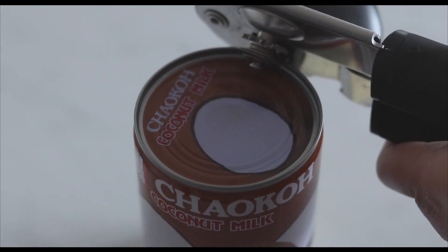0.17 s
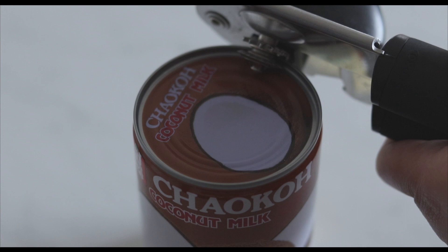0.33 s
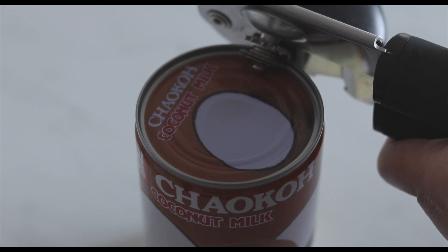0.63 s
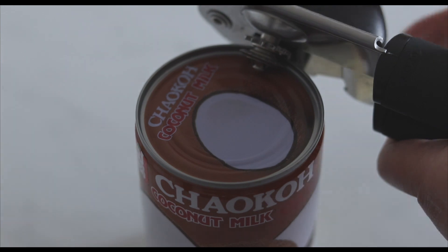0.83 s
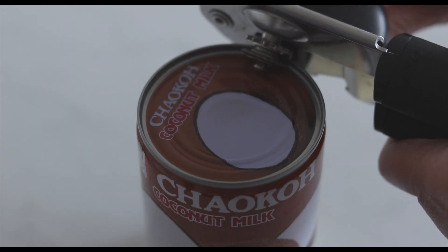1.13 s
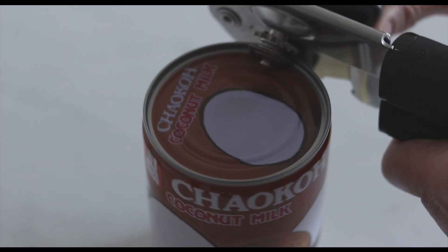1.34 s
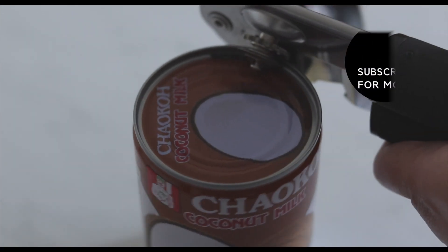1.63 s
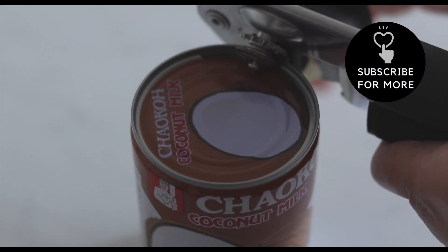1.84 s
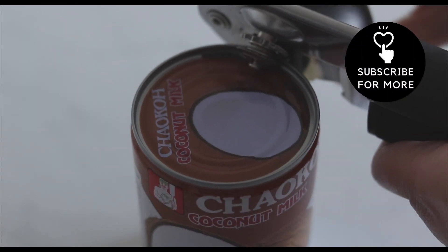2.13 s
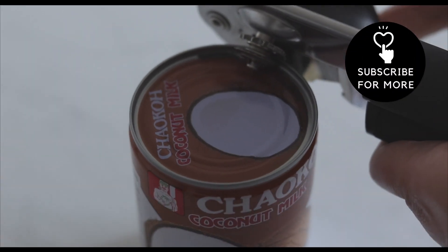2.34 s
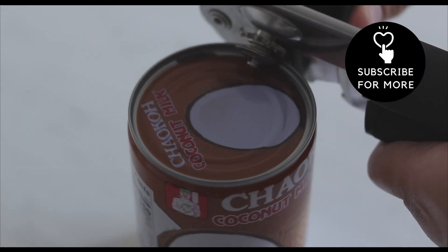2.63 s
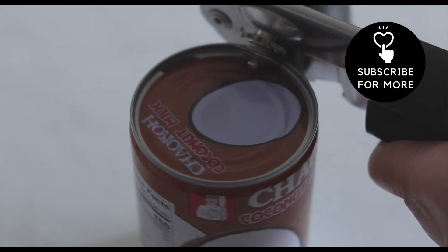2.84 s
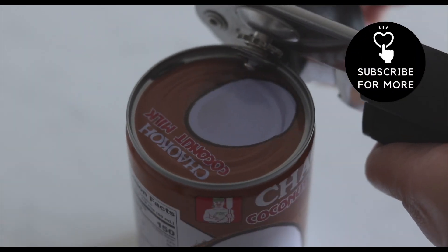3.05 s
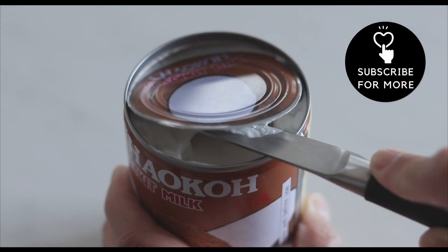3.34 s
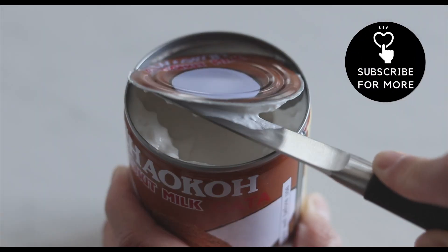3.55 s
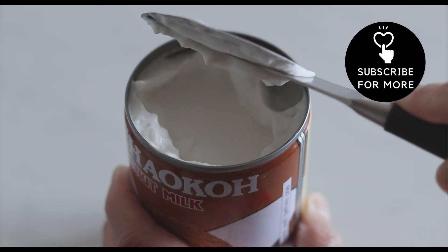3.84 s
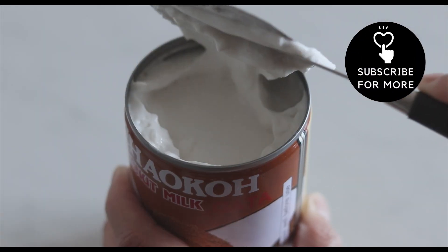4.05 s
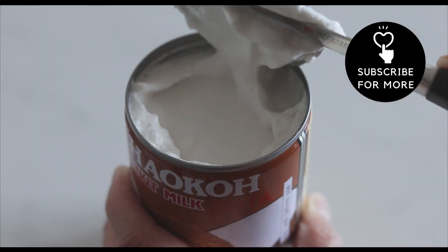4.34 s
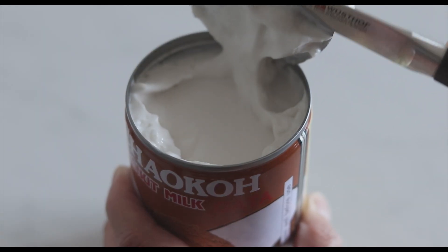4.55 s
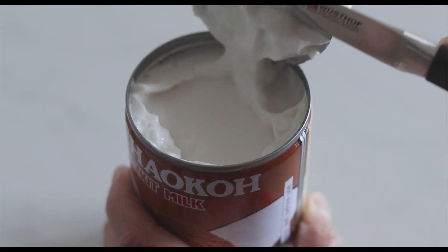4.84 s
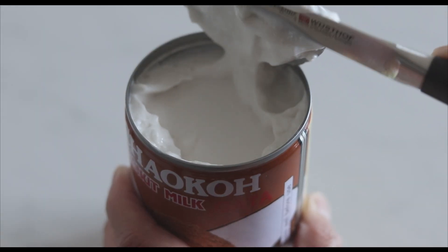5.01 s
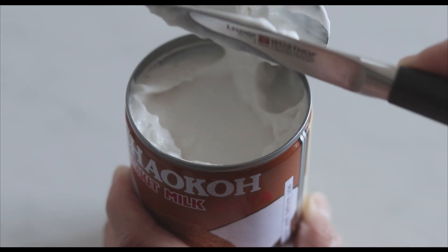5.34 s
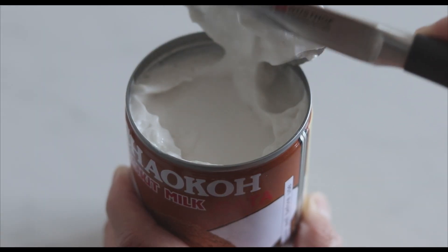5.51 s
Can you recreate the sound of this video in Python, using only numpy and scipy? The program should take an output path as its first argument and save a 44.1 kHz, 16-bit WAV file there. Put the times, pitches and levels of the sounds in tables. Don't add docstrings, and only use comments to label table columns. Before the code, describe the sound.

A full metal can is opened on a counter, heard close. Quiet handling leads to a piercing, clipped crack with a rattling room tail. The opener then clunks and crunches in two bursts, separated by light gear rubbing and one squeak. A blade stutters under the lid, plucking bent metal, and ends with very soft wet dabs over quiet room hum and hiss.

```python
import sys
import numpy as np
from scipy import signal
from scipy.fft import rfft, irfft
from scipy.io import wavfile

SR = 44100
rng = np.random.default_rng(int(sys.argv[2]) if len(sys.argv) > 2 else 0)


def volts(x):
    e = np.asarray(x, float) / 20
    return 10 ** e


def dump_mix(stems):
    frames = np.atleast_2d(stems).T
    limited = np.clip(frames, -1, 1)
    pcm = np.round(limited * 32767).astype(np.int16)
    wavfile.write(sys.argv[1], SR, pcm)


N = 250047


def evened(x):
    return x / np.sqrt(np.mean(x ** 2) + 1e-30)


def peaked(x):
    return x / abs(x).max()


def read(points, hz):
    f, value = np.transpose(points)
    return np.interp(np.log(hz + 1), np.log(f + 1), value)


def add(mix, s, sound):
    part = mix[round(s * SR):][:len(sound)]
    part += sound[:len(part)]


def coloured(x, points):
    cepstrum = irfft(np.log(volts(read(points, np.fft.rfftfreq(4096, 1 / SR)))))
    cepstrum[1:2048] *= 2
    cepstrum[2049:] = 0
    impulse = irfft(np.exp(rfft(cepstrum)))
    return evened(signal.oaconvolve(x, impulse)[:len(x)])


def resonate(x, hz, width):
    turn = np.exp(2j * np.pi * np.cumsum(hz * np.ones(len(x))) / SR)
    r = np.exp(-np.pi * width / SR)
    return 2 * (turn * signal.lfilter([1 - r], [1, -r], x / turn)).real


def resonate_twice(x, hz, width):
    return resonate(resonate(x, hz, width), hz, width)


def body(x, peaks):
    out = np.zeros(len(x))
    for k, (hz, width, db) in enumerate(peaks):
        out += (-1) ** k * volts(db) / np.sqrt(width) * resonate(x, hz, width)
    return evened(out)


def ring(hz, t60, rise=0.0013):
    t = np.arange(4000) / SR
    return volts(-60 * t / t60) * (1 - np.exp(-t / rise)) * np.sin(2 * np.pi * hz * t)


def plucks(rows, trim_db, t60, rise):
    out = np.zeros(N)
    for s, db, hz in rows:
        pair = ring(hz, t60, rise=rise) + .4 * ring(hz * 1.12, t60 * .7, rise=rise)
        add(out, s, volts(db + trim_db) * peaked(pair))
    return out


def grit(per_s, spread_db, lump_s=0.0029, count=N):
    draw = rng.random((count, 2))
    sizes = volts(-spread_db * np.log(draw[:, 0] + 1 / 20)) * (draw[:, 1] < per_s / SR)
    lumps = signal.lfilter([1], [1, -np.exp(-1 / (lump_s * SR))], sizes)
    return rng.standard_normal(count) * (.5 + lumps)


def burst(length, t60):
    t = np.arange(1500) / SR
    return rng.standard_normal(len(t)) * np.minimum(t / 0.00028, 1) * volts(-60 * np.maximum(t - length, 0) / t60)


def swell(start, end):
    count = round((end - start) * SR)
    return signal.windows.tukey(count, .3) * np.linspace(.6, 1, count)


def strokes(rows, slack_db):
    edge_s = .008
    out = np.zeros((2, N))
    for start, end, db, lean, hiss_db in rows:
        t = np.arange(0, end - start, 1 / SR)
        top = np.clip(lean, .02, .98) * (end - start)
        away = np.where(t < top, 1 - t / top, (t - top) / (end - start - top))
        fade = np.clip(np.minimum(t, t[::-1]) / edge_s, 0, 1)
        gain = volts(db + slack_db * away ** 2) * fade
        add(out[0], start, gain)
        add(out[1], start, volts(hiss_db) * gain)
    return out


# pitch_hz, width_hz, level_db
DRONES = [
    (115.9, 17, -7.5),
    (222, 26, -2),
]
# pitch_hz, width_hz, level_db
MOTOR_WHINE = (1345, 81, -19)
# start_s, end_s, pitch_hz, width_hz, level_db
PASSING_DRONE = (1.1, 2.5, 167, 9, -68)
# time_s, level_db
DRONE_LEVEL = [(0, -69.5), (1.3, -63.5), (2.4, -68.5), (3.2, -70.5), (3.9, -73), (5.67, -71.5)]
# freq_hz, level_db (per Hz)
AIR_COLOUR = [(20, -12), (60, -6), (150, -8.5), (300, -9.5), (800, -14), (1600, -20.5), (3000, -25),
              (6000, -28), (11500, -29), (12800, -32), (13500, -35), (16000, -35)]


def air():
    noise = rng.standard_normal((5, N))
    drones = sum(volts(db) * evened(resonate(z, hz, width)) for z, (hz, width, db) in zip(noise, DRONES))
    hz, width, db = MOTOR_WHINE
    drones += volts(db) * evened(resonate_twice(noise[4], hz, width))
    level_db = np.interp(np.arange(N) / SR, *np.transpose(DRONE_LEVEL))
    out = volts(-73) * coloured(noise[2], AIR_COLOUR) + volts(level_db) * drones
    start, end, hz, width, db = PASSING_DRONE
    shape = swell(start, end)
    add(out, start, volts(db) * shape * evened(resonate(noise[3], hz, width))[:len(shape)])
    return out


# start_s, end_s, crunch_db, build_share (of the push), tear_db
TURNS = [(0.0, .36, -69, 0.093, -8.5), (.95, 1.17, -69.5, .15, -9), (1.17, 1.41, -66.5, 1, -12.5),
         (1.39, 1.6, -54.5, .2, -12), (1.56, 1.86, -56, 0.44, -11.5), (1.86, 2.06, -71, 0.099, -6),
         (2.06, 2.42, -72, .4, -12), (2.41, 2.57, -60.5, 0.89, -10), (2.56, 2.81, -56, 0.19, -13.5),
         (2.81, 3.09, -54, 0.35, -11), (3.1, 3.22, -64, .1, -4.5), (3.26, 3.42, -66, 0.27, -11.5)]
# freq_hz, level_db (per Hz)
CRUNCH_COLOUR = [(88, -37), (150, -9), (373, -3), (572, 1.5), (688, -5), (816, 1), (1070, -9), (1400, -11),
                 (1570, -12), (1970, -11), (2240, -19), (3390, -21.5), (4500, -28), (5850, -55.5),
                 (9900, -120)]
# freq_hz, level_db (per Hz)
TEAR_COLOUR = [(1470, -28.5), (2500, -1), (5970, -3), (6590, -3.5), (8220, -2.5), (8870, -3), (11000, -13),
               (15500, -20)]
# time_s, pitch_hz, level_db
WHEEL_RING = [
    (1.3, 1501, -17),
    (1.9, 1500, -21),
    (2.4, 1900, -7.5),
    (3.05, 1820, -8),
    (3.25, 1450, -10),
]
# start_s, peak_db, pitch_hz
DABS = [(1.417, -29.5, 398), (1.444, -35, 517), (1.454, -38, 825), (1.499, -42, 598), (1.547, -45, 377),
        (1.654, -47, 589), (1.684, -48, 503), (1.744, -43, 618.6), (1.774, -42.5, 896), (1.792, -48, 388),
        (2.529, -49.5, 388), (2.589, -44, 848), (2.611, -45, 834), (2.646, -46, 729), (2.671, -45.5, 606),
        (2.704, -48.5, 384), (2.734, -50.5, 334), (2.768, -50, 836), (2.877, -38.5, 583), (2.967, -44, 763),
        (2.984, -43, 630), (3.029, -57, 611), (3.054, -53, 584), (3.25, -50.5, 740), (3.299, -54, 789),
        (3.346, -53, 592), (4.202, -63, 840), (4.491, -59, 853), (4.559, -63, 907), (4.634, -59, 810),
        (4.67, -57, 867), (4.985, -59, 842)]


def cutting():
    slip = grit(500, 2.5, lump_s=.0015)
    hiss = coloured(grit(900, .5, lump_s=.003), TEAR_COLOUR)
    s, hz, db = np.transpose(WHEEL_RING)
    t = np.arange(N) / SR
    wheel = volts(np.interp(t, s, db)) * evened(resonate_twice(slip, np.interp(t, s, hz), 450))
    push, tear = strokes(TURNS, -9.5)
    crunch = coloured(slip, CRUNCH_COLOUR)
    return push * (crunch + wheel) + tear * hiss + plucks(DABS, -3, .03, .0015)


# start_s, peak_db, pitch_hz (strongest), hardness_db
KNOCKS = [(0.094, -37, 540, -12), (1.111, -37, 410, -9), (1.403, -21.5, 819, -2), (1.434, -30.5, 476, -13),
          (1.477, -36, 407, -5.5), (1.534, -30.5, 495, -15), (1.625, -40.5, 574, -4),
          (1.728, -40.5, 595, -5), (1.762, -41, 792, -13), (2.486, -44, 856, -13.5),
          (2.567, -40, 398.4, -5.5), (2.837, -37, 615.6, -23), (2.866, -37.5, 529.6, -20),
          (2.894, -38.5, 484, -14), (2.923, -33.5, 600, -15), (2.947, -39.5, 820, -22),
          (3.003, -42, 460, -3.5), (3.191, -30.5, 523, -9.5), (4.009, -52.5, 836, -9),
          (4.259, -47.5, 799, -6), (4.292, -57, 853, -16.5), (4.754, -49, 451.6, -5.5),
          (4.961, -56, 827, -14.5), (5.031, -50, 872, -11), (5.049, -55, 856, -9)]
# pitch_hz, level_db
TIN_MODES = [(405, -5.5), (600, -6), (845, -6.5), (1450, -11), (1900, -16), (2150, -18)]
# freq_hz, level_db (per Hz)
THUD_COLOUR = [(88, -37), (150, -7), (615, 1), (1540, -20.5), (2430, -34), (3920, -37), (6430, -43),
               (7310, -39), (12000, -47), (15600, -81), (22000, -120)]
# freq_hz, level_db (per Hz)
CLUNK_COLOUR = [(350, -30), (600, -0.5), (1030, -2), (2100, -14), (3790, -33.5), (6020, -35.5), (6490, -41),
                (12000, -52), (15600, -86), (22000, -120)]
# start_s, peak_db, pitch_hz
JAW_RINGS = [(1.1109, -54, 1350), (1.4027, -23.5, 1450), (1.4332, -40, 1106), (1.4764, -42, 1330),
             (1.6241, -42, 1340), (1.728, -45, 1330), (1.7614, -51.5, 1150), (2.5244, -52.5, 1130),
             (2.5675, -45.5, 1352), (2.595, -50, 1474), (2.6094, -55, 1360), (2.6852, -51.5, 1170),
             (2.7407, -54, 1790), (2.845, -47, 1746), (2.8669, -47, 1730), (2.9235, -48.5, 1840),
             (2.9465, -54, 1320), (3.003, -44, 1200), (3.1243, -48.5, 1250), (3.1887, -48, 1130),
             (4.1754, -56.5, 1410), (4.7524, -61, 1960), (5.0494, -59, 1140)]
# start_s, peak_db, pitch_hz
FRAME_RINGS = [
    (1.4029, -28, 1710),
    (1.411, -42, 1850),
    (1.6657, -51, 1920),
    (1.7035, -47.5, 3370),
    (2.9233, -47, 1830),
    (3.003, -43, 1800),
    (3.0544, -59, 2570),
    (3.1245, -50, 3320),
]


def knocks():
    t60_s = .027
    out = plucks(JAW_RINGS, -4, 0.023, .001) + plucks(FRAME_RINGS, -3, 0.0135, 0.00053)
    detunes = rng.uniform(.93, 1.2, (len(KNOCKS), len(TIN_MODES)))
    for (s, db, hz, hard_db), detune in zip(KNOCKS, detunes):
        tin = ring(hz, t60_s)
        for (f, mode_db), k in zip(TIN_MODES, detune):
            tilt_db = hard_db * np.log2(f / 400) / 2
            tin += volts(mode_db + tilt_db) * ring(f * k, t60_s * (500 / f) ** 0.19)
        add(out, s, volts(db - 2.5) * peaked(tin))
        add(out, s, volts(db - 7.5) * peaked(coloured(burst(.001, 0.055), THUD_COLOUR)))
        add(out, s, volts(db + 2 * hard_db + 5.0) * peaked(coloured(burst(0.0022, 0.017), CLUNK_COLOUR)))
    return out


# start_s, peak_db, pitch_hz, t60_s
BITE = [(.4258, 5.5, 3940, 0.0096), (0.4263, -2.5, 1875, 0.013), (.4268, -11.5, 14000, 0.011),
        (0.4287, 5, 9000, 0.015), (0.429, -4, 3400, 0.025), (.4305, 0.5, 799, 0.05), (.4315, -8, 1074, .04),
        (.432, -9, 610, .05), (0.43, -2, 1330, 0.021), (.4310, -10, 430, 0.054), (0.431, -21, 330, 0.085),
        (.431, -24, 310, .09), (.4275, -13, 6050, 0.009), (0.445, -11.5, 1135, 0.024),
        (.4340, -17.5, 8280, 0.011)]
# freq_hz, level_db (per Hz)
CRACKLE_COLOUR = [(1350, -31.5), (2300, 1.5), (2530, -2.5), (5070, -4.5), (6750, -4), (7370, -6),
                  (11100, -8), (12300, -18.5), (15500, -18)]
# freq_hz, level_db (per Hz)
BITE_SPREAD = [(59, -57.5), (100, -26), (169, -21), (223, -23), (306, -7), (340, -18.5), (467, -2),
               (712, -5), (774, 0.5), (976, -8.5), (1060, -2), (1800, -8), (4010, -11), (8580, -16),
               (15500, -30.5)]
# pitch_hz, level_db, t60_s, width_hz
HANDLES = [
    (1170, -39, 1.0, 110),
    (1310, -44, 0.94, 90),
    (3880, -46, 1.05, 90),
    (4000, -32, .7, 350),
    (629.4, -36, .6, 80),
]


def bite():
    out, spread = np.zeros((2, N))
    start = BITE[0][0]
    for s, db, hz, t60 in BITE:
        pair = ring(hz, t60, rise=0.00039) + .4 * ring(hz * 1.07, t60 * 1.29, rise=0.00076)
        add(out, s, volts(db) * pair)
    add(out, start, volts(2) * peaked(coloured(burst(0.0053, 0.012), CRACKLE_COLOUR)))
    add(out, start, volts(-26.5) * signal.windows.hann(400))
    add(spread, start, volts(15.5) * coloured(signal.unit_impulse(2000), BITE_SPREAD) / 45)
    t = np.arange(SR) / SR
    for hz, db, t60, width in HANDLES:
        add(out, start, volts(db - 60 * t / t60) * evened(resonate(rng.standard_normal(SR), hz, width)))
    return out, spread


# start_s, end_s, ring_db, pitch_hz, hiss_db
RUBS = [(1.036, 1.11, -88, 9080, -73.5), (1.19, 1.215, -80.5, 3800, -82), (1.865, 1.939, -71, 3870, -68),
        (1.89, 1.927, -69, 9170, -74), (2.01, 2.088, -71, 10060, -73.5), (2.025, 2.046, -74, 12900, -93.5),
        (2.084, 2.116, -81.5, 9530, -66), (2.141, 2.156, -69, 3890, -80), (2.142, 2.26, -81, 3890, -85),
        (2.18, 2.252, -78, 9220, -80), (2.178, 2.257, -82, 7240, -88), (2.292, 2.359, -79.5, 3840, -95),
        (3.127, 3.184, -72, 3820, -66), (3.139, 3.173, -72, 8850, -71.5), (3.228, 3.252, -79.5, 10280, -63)]
# freq_hz, level_db (per Hz)
RUB_COLOUR = [(1760, -43), (3000, -9), (3760, -7), (4750, -22), (8410, -10), (9070, -7), (15500, -16)]
# start_s, end_s, level_db
SQUEAK_AT = (2.07, 2.118, -56)
# pitch_hz, width_hz, level_db
SQUEAK_PEAKS = [
    (790, 250, 0.5),
    (1225, 60, 6),
    (1790, 700, -6),
    (2485, 15, 6.5),
    (3304, 500, -9),
    (3890, 34, -12),
    (6760, 39, -26),
    (7600, 77, -4),
]


def gears():
    out = np.zeros(N)
    for start, end, db, hz, hiss_db in RUBS:
        width = 57 * (hz / 4000) ** 1.7
        rub = grit(900, 1.4, count=8000)
        shape = swell(start, end)
        sound = volts(db) * evened(resonate(rub, hz, width)) + volts(hiss_db) * coloured(rub, RUB_COLOUR)
        add(out, start, shape * sound[-len(shape):])
    start, end, db = SQUEAK_AT
    shape = swell(start, end)
    squeak = body(grit(500, 2.1, count=8000), SQUEAK_PEAKS)
    add(out, start, volts(db) * shape * squeak[-len(shape):])
    return out


# start_s, peak_db, pitch_hz (strongest)
TICKS = [(1.0913, -60, 3906), (1.4015, -36, 3040), (1.411, -48, 3515), (1.4203, -39.5, 2980),
         (1.625, -42.5, 4800), (1.6674, -55, 3334), (1.7039, -47, 3383), (1.7284, -45, 3870),
         (1.7887, -48, 3173), (2.1445, -62, 3890), (2.4863, -59, 3330), (2.5676, -36, 6850),
         (2.5684, -40, 12600), (2.6844, -49.5, 9090), (2.7385, -54.5, 4114), (2.8344, -55, 3660),
         (2.8767, -50.5, 4570), (2.9229, -44, 3170), (2.9414, -52, 3360), (2.99, -48, 3700),
         (3.0022, -44.5, 3260), (3.04, -53, 3700), (3.055, -49, 8600), (3.1144, -58, 8740),
         (3.1247, -40, 6720), (3.343, -50.5, 4690), (4.0195, -51, 4156), (4.175, -58, 4200),
         (4.2585, -51, 7000), (5.0486, -55, 4333), (5.4834, -57, 8020), (5.5325, -58, 4120)]
# freq_hz, level_db (per Hz)
TICK_COLOUR = [(900, -24.5), (2500, -0.5), (6010, -9), (6640, -2), (8040, -8), (9010, -4), (10900, -7),
               (15500, -9)]


def ticks():
    out = np.zeros(N)
    for s, db, hz in TICKS:
        add(out, s, volts(db - 5) * peaked(coloured(burst(0.0007, 0.011), TICK_COLOUR)))
        add(out, s, volts(db - 12) * peaked(ring(hz, .012, rise=0.00057)))
    return out


# start_s, end_s, hum_db, build_share (of the stroke), blade_hiss_db
SCRAPE = [
    (3.24, 3.36, -62, .1, -15),
    (3.45, 3.54, -48, 0.57, -29.5),
    (3.54, 3.585, -45.5, 0.85, -14),
    (3.585, 3.705, -54, .1, -21),
    (3.712, 3.75, -47.5, 0.24, -23),
    (3.742, 3.855, -47, 0.074, -1),
    (3.85, 3.995, -61, .1, -13),
]
# freq_hz, level_db (per Hz)
BLADE_COLOUR = [(1350, -28), (2300, 7), (2510, -9), (3510, -2), (4090, 0), (5110, -5), (6340, -1.5),
                (7090, -5), (11200, -6.5), (12500, -19), (15500, -28)]


def scraping():
    a, b = 3 * SR, 4 * SR
    press, edge = strokes(SCRAPE, -8)
    rasp = grit(600, 2.0, lump_s=.002, count=SR)
    bend_hz = np.interp(np.arange(a, b) / SR, *np.transpose(SLIPS)[[0, 2]])
    rings = [(bend_hz, 450, -7), (850, 380, -3), (540, 250, -2), (380, 150, -8), (220, 120, -2),
             (bend_hz * 2.04, 700, -9), (4250, 300, -12)]
    hum = sum(volts(db) * resonate_twice(rasp, hz, width) for hz, width, db in rings)
    out = np.zeros(N)
    out[a:b] = press[a:b] * evened(hum)
    out[a:b] += edge[a:b] * coloured(rasp, BLADE_COLOUR)
    return out


# start_s, peak_db, pitch_hz (lid), crackle_db
SLIPS = [(3.4505, -55, 1450, -59.5), (3.454, -38, 1470, -53), (3.4645, -26, 1380, -33),
         (3.474, -28, 1440, -42), (3.484, -40.5, 1480, -52), (3.493, -45, 1380, -59),
         (3.518, -30.5, 1403, -46), (3.531, -35, 1490, -36), (3.555, -29.5, 1714, -35),
         (3.561, -44, 1730, -43), (3.571, -61, 1520, -53), (3.59, -39.5, 1413, -39),
         (3.604, -50, 1410, -52), (3.622, -38, 1450, -51), (3.646, -28, 1740, -44), (3.664, -52, 1800, -57),
         (3.711, -29, 1837, -35), (3.7165, -33, 1460, -39.5), (3.732, -38, 1710, -54),
         (3.747, -33.5, 1447, -40), (3.755, -35, 1500, -40), (3.765, -37, 1530, -40),
         (3.774, -36.5, 1770, -60), (3.8, -35, 1638, -49), (3.807, -37.5, 1674, -44),
         (3.819, -38.5, 1446, -42.5), (3.83, -42, 1590, -60), (3.842, -43.5, 1650, -60)]
# ratio (to the lid pitch), level_db
LID_RATIOS = [
    (1.2, -9.5),
    (2.1, -26),
]
# start_s, peak_db, pitch_hz
RIM_RINGS = [(3.452, -37.5, 760), (3.463, -29.5, 782), (3.472, -35, 721), (3.497, -37, 725),
             (3.516, -40, 832), (3.529, -39, 570), (3.555, -36, 713), (3.57, -42, 447), (3.588, -40, 795),
             (3.605, -45, 837), (3.622, -39, 827), (3.644, -49, 471), (3.662, -44.5, 503),
             (3.712, -39, 870), (3.73, -43, 875), (3.745, -42, 896), (3.754, -39.5, 870), (3.763, -46, 910),
             (3.772, -47, 504), (3.801, -46, 710), (3.805, -47, 850), (3.817, -45, 540), (3.829, -46, 790),
             (3.842, -51, 987)]
# start_s, peak_db, pitch_hz
EDGE_RINGS = [(3.4532, -39.5, 2890), (3.4635, -40, 3470), (3.473, -41, 2860), (3.4844, -49, 3510),
              (3.518, -48, 2810), (3.5319, -38, 2900), (3.5563, -39, 3070), (3.5704, -49, 3000),
              (3.5912, -40, 3020), (3.6054, -53, 4250), (3.6204, -49, 2940), (3.6446, -46, 3370),
              (3.6624, -48, 2960), (3.7115, -38, 3460), (3.7154, -36, 4130), (3.7454, -48, 2800),
              (3.7526, -43, 2800), (3.7646, -41, 3100), (3.7724, -40, 4150), (3.7984, -43, 3990),
              (3.8058, -45, 3500), (3.8174, -46, 2940)]


def slips():
    slip_s, swell_s, lead_s = 0.00296, .004, .0008
    out = plucks(RIM_RINGS, -2.5, 0.032, .0025) + plucks(EDGE_RINGS, -6.5, .012, .002)
    for s, db, hz, crackle_db in SLIPS:
        lid = ring(hz, 0.0227, rise=slip_s)
        for ratio, ratio_db in LID_RATIOS:
            lid += volts(ratio_db) * ring(hz * ratio, 0.0217, rise=slip_s)
        gather = np.minimum(np.arange(len(lid)) / SR / swell_s, 1)
        add(out, s, volts(db - 1.5) * peaked(lid * gather))
        crackle = coloured(burst(slip_s, 0.01316), CRACKLE_COLOUR)
        add(out, s - lead_s, volts(crackle_db + 4.5) * peaked(crackle))
    return out


# start_s, end_s, drag_db, build_share (of the stroke), wet_db
SMEAR = [
    (3.9, 4.0, -74, .1, -5),
    (4.0, 4.21, -63.5, 0.33, -16),
    (4.2, 4.39, -67, .4, -17),
    (4.38, 4.63, -73, 0.69, -20),
    (4.62, 4.73, -65.5, .3, -16),
    (4.72, 4.9, -69, 0.091, -5.5),
    (4.94, 5.01, -67.5, 0.48, -20),
    (5.01, 5.13, -66, .25, -21.5),
]
# freq_hz, level_db (per Hz)
DRAG_COLOUR = [(180, -35), (300, -4), (595, -4.5), (661, -7), (883, 0.5), (1050, -4), (3000, -25),
               (3900, -51), (6600, -120)]
# freq_hz, level_db (per Hz)
WET_COLOUR = [(1180, -28), (2000, -2), (3180, -13), (4930, -9), (5490, -17.5), (10000, -25), (13000, -57),
              (22000, -120)]


def smearing():
    drag = grit(200, 1.0, lump_s=.004)
    soft, wet = strokes(SMEAR, -15)
    return soft * coloured(drag, DRAG_COLOUR) + wet * coloured(drag, WET_COLOUR)


# freq_hz, t60_s
KITCHEN_T60 = [
    (100, 0.093),
    (260, 0.59),
    (700, 0.52),
    (1840, 0.61),
    (4850, 0.64),
    (12800, 0.33),
]
# delay_s, level_db
ECHOES = [
    (.018, 4),
    (.024, 2.5),
    (.039, 5),
    (.048, 3),
]


def kitchen():
    taps = np.zeros(SR)
    at = np.arange(300, SR - 5, 5)
    taps[at + rng.integers(0, 5, len(at))] = rng.choice([-1., 1.], len(at))
    t = np.arange(SR) / SR
    taps *= volts(sum(db * np.exp(-((t - s) / 0.0035) ** 2) for s, db in ECHOES))
    hz, t, z = signal.stft(taps, SR, nperseg=256)
    decay = volts(-60 * t / read(KITCHEN_T60, hz)[:, None])
    tail = signal.istft(z * decay, SR, nperseg=256)[1]
    return tail / np.linalg.norm(tail)


# freq_hz, level_db
WALL_COLOUR = [
    (100, 2),
    (1000, -1),
    (4000, -2.5),
    (9000, -8),
    (15000, -21.5),
]


def scene():
    snap, spread = bite()
    opener = cutting() + knocks() + gears() + ticks()
    lid = scraping() + slips() + smearing()
    no_bass = signal.butter(2, 170, "high", fs=SR, output="sos")
    opener, lid = signal.sosfilt(no_bass, [opener, lid])
    sent = volts(-8.5) * opener + volts(-13) * lid
    sent = np.std(sent) * coloured(sent, WALL_COLOUR) + spread
    echo = signal.fftconvolve(sent, kitchen())[:N]
    return (snap + opener + lid + echo + air())[None]


def band_limit(x):
    return signal.sosfilt(signal.butter(12, 15640, fs=SR, output="sos"), x)


def record(dry):
    ceiling = 0.94
    heard = signal.sosfilt(signal.butter(2, 45, "high", fs=SR, output="sos"), dry)
    return band_limit(np.clip(heard, -ceiling, ceiling))


dry = scene()
out = record(dry)
dump_mix(out)
```